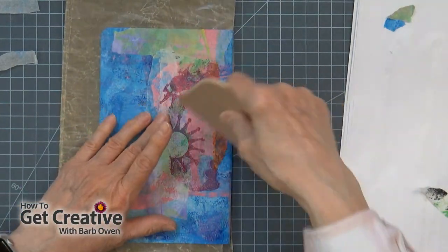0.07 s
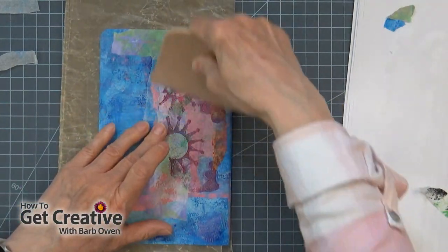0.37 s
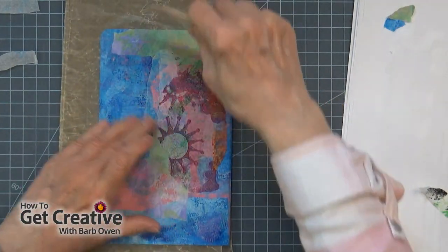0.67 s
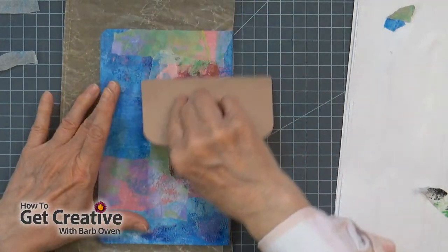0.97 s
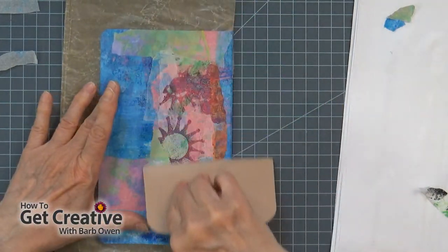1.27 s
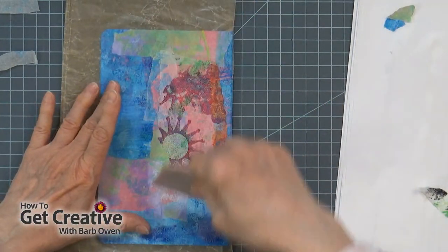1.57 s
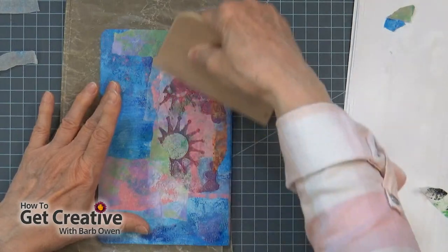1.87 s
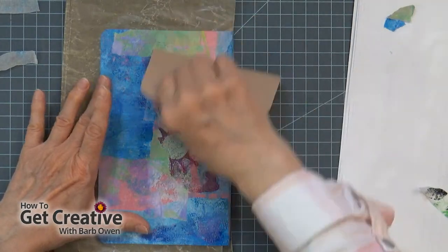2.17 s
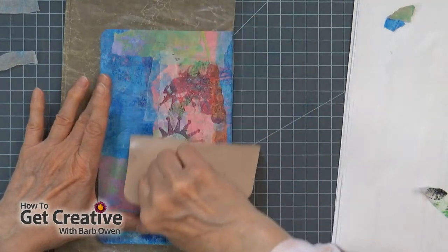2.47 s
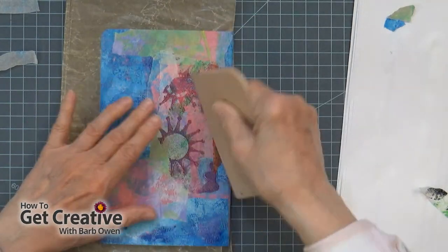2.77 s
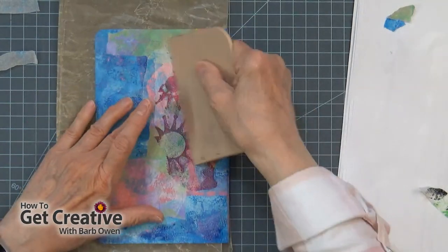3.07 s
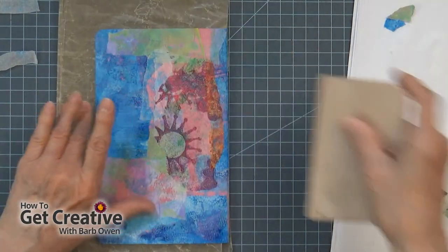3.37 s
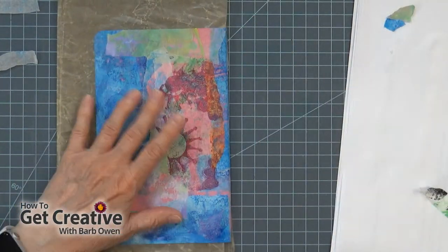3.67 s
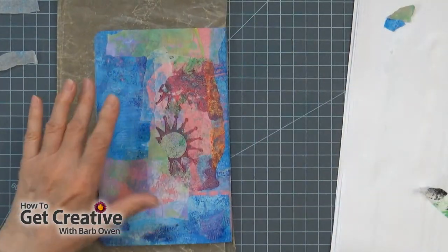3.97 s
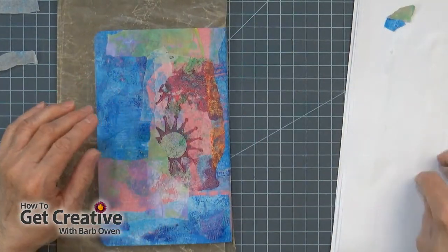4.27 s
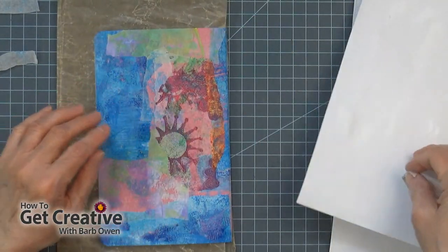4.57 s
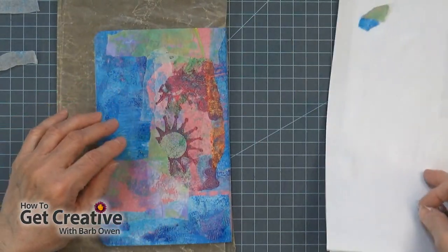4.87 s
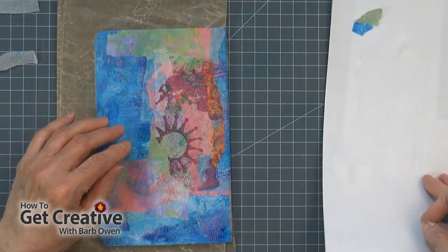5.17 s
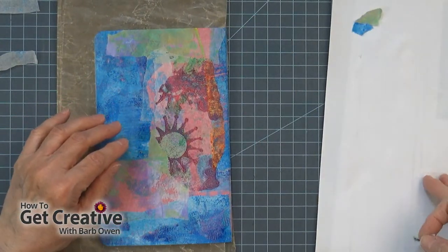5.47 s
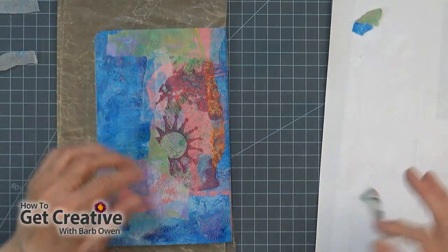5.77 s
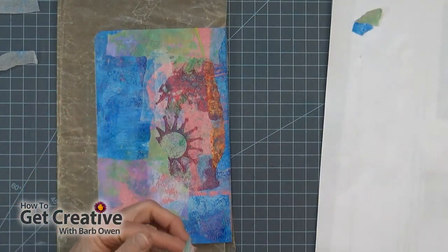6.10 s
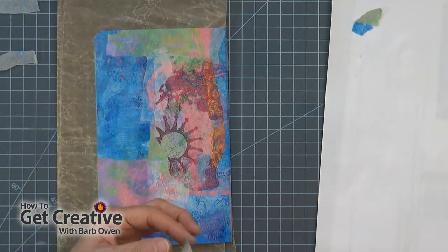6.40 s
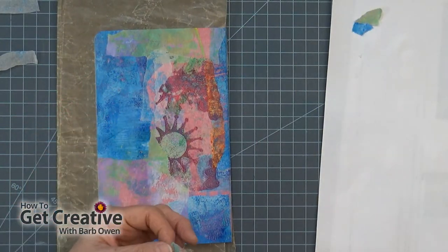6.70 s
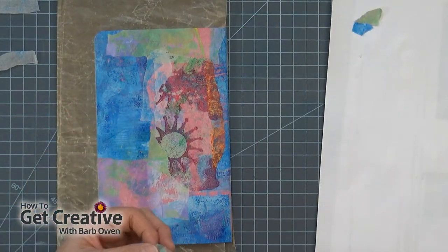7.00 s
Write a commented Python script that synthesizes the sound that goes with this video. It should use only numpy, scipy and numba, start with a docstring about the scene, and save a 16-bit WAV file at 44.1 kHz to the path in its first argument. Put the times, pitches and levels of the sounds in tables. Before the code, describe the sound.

Heard close up in a small room, dry, raspy rubbing stops and restarts five times as a cardboard edge is dragged over glued paper. Light clicks fall between the strokes, and the table rumbles faintly underneath. The scraping gives way to a hand sliding on the page, a few dull bumps, and a sheet of paper rustling and snapping as it is moved. A few faint ticks remain over a soft hiss.

```python
"""Over a soft hiss, a piece of cardboard scrapes in five strokes across freshly glued paper on a table.
Its edge catches and slips on the fibres, and it ticks as it is lifted and set down. Then a hand brushes
the page, and a loose sheet slides off its stack, crackles as it buckles, and settles. The table rumbles
and thumps under the work. One close microphone hears it all in a small room."""
import sys
import numpy as np
from scipy import signal
from scipy.fft import rfft, irfft, next_fast_len
from scipy.io import wavfile
from scipy.ndimage import uniform_filter1d
from numba import njit

SR = 44100
rng = np.random.default_rng(int(sys.argv[2]) if len(sys.argv) > 2 else 0)


def transcribe(signal):
    """Save signal, clipped to [-1, 1], as a 16-bit WAV file at the path in sys.argv[1]."""
    frames = np.atleast_2d(signal).T
    limited = np.clip(frames, -1, 1)
    pcm = np.round(limited * 32767).astype(np.int16)
    wavfile.write(sys.argv[1], SR, pcm)


N = 319284


def from_db(db):
    """Turn decibels into a number to multiply by."""
    return 10 ** (np.asarray(db) / 20)


def rms_one(x):
    """Scale a sound so that its average strength (rms) is 1."""
    return x / np.sqrt(np.mean(x ** 2) + 1e-20)


def in_time(rows):
    """Join (time_s, value) points with straight lines, giving a value at every sample."""
    times_s, values = np.transpose(rows)
    return np.interp(np.arange(N) / SR, times_s, values)


def at_hz(points, hz):
    """Read between (pitch_hz, value) points, with octaves evenly spaced."""
    pitches_hz, values = np.transpose(points)
    return np.interp(np.log(np.maximum(hz, 1)), np.log(pitches_hz), values)


def coloured(x, tone):
    """Shape the lows and highs of a sound with a tone table; the result has strength 1."""
    size = next_fast_len(N)
    hz = np.maximum(np.arange(size // 2 + 1) * SR / size, 1)
    fade_past_ends = np.minimum(1, np.minimum(hz / tone[0][0], tone[-1][0] / hz)) ** 2
    return rms_one(irfft(rfft(x, size) * from_db(at_hz(tone, hz)) * fade_past_ends, size)[:N])


def drift(rate_hz):
    """A smooth random wobble, about 1 in size."""
    step, warm_up = 20, 2000
    r = np.exp(-2 * np.pi * rate_hz * step / SR)
    noise = rng.standard_normal(N // step + warm_up + 2)
    slow = signal.lfilter([1], [1, -2 * r, r * r], noise)[warm_up:]
    return np.interp(np.arange(N) / step, np.arange(len(slow)), rms_one(slow))


def resonate(x, hz, width_hz):
    """Ring at one pitch; a smaller width rings longer."""
    r = np.exp(-np.pi * width_hz / SR)
    return signal.lfilter([1, 0, -1], [1, -2 * r * np.cos(2 * np.pi * hz / SR), r * r], x)


@njit
def glide(x, hz, width_hz):
    """Ring at a pitch that moves."""
    angle, r = 2 * np.pi * hz / SR, np.exp(-np.pi * width_hz / SR)
    y = np.zeros(len(x))
    for i in range(2, len(x)):
        y[i] = x[i] - x[i - 2] + 2 * r * np.cos(angle[i]) * y[i - 1] - r * r * y[i - 2]
    return y


def band(x, low_hz, high_hz):
    """Keep the sound between two pitches."""
    edges_hz = [low_hz, min(high_hz, SR * .45)]
    return signal.sosfilt(signal.butter(2, edges_hz, "band", fs=SR, output="sos"), x)


def swell(peak_s, rise_s, fall_s, roundness=1):
    """Rise to 1 and fall away; more roundness holds the top longer."""
    t = np.arange(N) / SR - peak_s
    distance = t / np.where(t < 0, rise_s, fall_s)
    return np.exp(roundness - np.minimum(np.hypot(roundness, distance), 30))


def rub(peak_s, rise_s, fall_s, db, low_db, high_db):
    """Power of one passing rub in its low, middle and high parts."""
    return (from_db([[db + low_db], [db], [db + high_db]]) * swell(peak_s, rise_s, fall_s)) ** 2


def friction(per_s, spread_db, smooth_share):
    """Fibres catch and let go: tiny slips of uneven size over a smooth rub."""
    sizes = from_db(spread_db * np.minimum(rng.exponential(1, N), 5)) * rng.choice([-1, 1], N)
    slips = rms_one(sizes * (rng.random(N) < per_s / SR))
    return rms_one(slips + smooth_share * rng.standard_normal(N))


# Tone of the room's hiss: pitch_hz, relative_db
HISS_TONE = [(60, -10), (140, -5), (200, -7), (270, -10), (500, -11.5), (850, -14), (1500, -23.5),
             (2400, -16.5), (4000, -15.5), (4900, -23.5), (6500, -24), (7500, -26), (9000, -28.5),
             (15000, -32)]
# Pitches that stand out in it: pitch_hz, rough_width_hz, base_level_db
HISS_PEAKS = [(26.8, 16, -61.5), (134, 33, -66.5), (178.4, 17, -70.5), (530, 112, -75), (1265, 110, -74),
              (2210, 67, -70.5), (2868, 42, -71), (3420, 180, -66)]
# How the whole hiss rises and falls: time_s, change_db
HISS_CHANGES = [(0, 4), (3.2, 3.5), (4.3, 1.5), (5.15, 5), (5.7, -2.5), (6.9, -1), (7.03, 5.5), (7.24, 1.5)]


def room_hiss(base_level_db=-58):
    """Soft background noise with a few faint hums in it."""
    hiss = from_db(base_level_db) * coloured(rng.standard_normal(N), HISS_TONE)
    for hz, width_hz, db in HISS_PEAKS:
        wide_hz = 1.37 * width_hz  # ringing twice narrows the peak again
        hum = resonate(resonate(rng.standard_normal(N), hz, wide_hz), hz, wide_hz)
        hiss += from_db(db) * rms_one(hum)
    return from_db(in_time(HISS_CHANGES)) * hiss


# Tone of the table's rumble: pitch_hz, relative_db
RUMBLE_TONE = [(15, -38), (28, 6.5), (45, -8), (80, -16), (140, -17), (250, -26.5), (500, -23), (1200, -61)]


def table_rumble(rubbing, rest_db=-65, work_db=-53, ordinary_drag_db=-46.5, average_s=0.16):
    """The table rumbles more the harder the hands work."""
    effort = (rubbing / from_db(ordinary_drag_db)) ** 0.36  # follows only part of each swing
    effort = uniform_filter1d(effort, int(average_s * SR))
    strength = np.hypot(from_db(rest_db), from_db(work_db) * effort)
    return strength * coloured(rng.standard_normal(N), RUMBLE_TONE)


SETTLE_S, LIFT_S = 0.032, 0.025  # how long a drag takes to build up and to die away


def lift(end_s):
    """Full contact that fades once the card leaves."""
    return np.exp(-np.clip((np.arange(N) / SR - end_s) / LIFT_S, 0, 20))


def bite(age_s, full_s):
    """The edge digs in, grips hardest after full_s and then eases."""
    progress = age_s / full_s
    return (progress * np.exp(1 - np.minimum(progress, 20))) ** 2


# The card has a low flex (bending), a middle rasp and a high hiss.
# In its tables, level_db sets the rasp; flex_db and hiss_db are added to that for the other two.
# Fingers and sleeve graze the held card: until_s, level_db, flex_db, hiss_db
CARD_GRAZE = (4, -60.5, -13, 3)
# The card brushes the page between strokes: peak_s, rise_s, fall_s, level_db, flex_db, hiss_db
CARD_BRUSHES = [(0.06, 0.028, 0.059, -55, -9, 8), (0.69, 0.029, 0.029, -48, -12, 10),
                (2.705, 0.013, 0.017, -46, -10, 6.5), (2.82, 0.023, 0.015, -47.5, -13, 5.5),
                (2.98, 0.013, 0.018, -44.5, -4, 7.5), (3.285, 0.067, 0.052, -53, -4, 13)]


def card_touches():
    """Power of the flex, rasp and hiss from light touches on the card."""
    until_s, db, flex_db, hiss_db = CARD_GRAZE
    graze = from_db(db) * from_db([[flex_db], [0], [hiss_db]]) * lift(until_s)
    return graze ** 2 + sum(rub(*row) for row in CARD_BRUSHES)


# Strokes of the card over the page:
# start_s, end_s, full_bite_s, bite_db, hiss_above_bite_db, drag_db, start_pitch_hz, end_pitch_hz
CARD_STROKES = [(0.213, 0.537, 0.089, -43, 8.5, -47.5, 855, 780),
                (0.83, 1.441, 0.089, -42.5, 3, -52, 650, 1090),
                (1.668, 1.977, 0.08, -38, 8.5, -50.5, 910, 900),
                (2.059, 2.558, 0.1, -47.5, 11, -46, 1150, 1150),
                (3.023, 3.176, 0.086, -41, 5, -43, 980, 1130)]
# The flick that ends each stroke: level_db, rise_s, fall_s, flex_db, hiss_db
CARD_FLICKS = [(-32, 0.012, 0.0067, -1.5, 14), (-26.5, 0.024, 0.0072, -5.5, 3), (-31, 0.021, 0.011, -8, 7),
               (-35, 0.0088, 0.0059, -5.5, 12), (-25, 0.021, 0.0056, -5.5, 4)]


def card_strokes(bite_flex_db=-3.5, drag_hiss_db=4, flex_lead_s=0.012, roundness=2.23):
    """Power of the flex, rasp and hiss as each stroke bites, drags and speeds up into a flick."""
    t, power = np.arange(N) / SR, 0
    for stroke, ending in zip(CARD_STROKES, CARD_FLICKS):
        start_s, end_s, full_s, bite_db, bite_hiss_db, drag_db, _, _ = stroke
        flick_db, rise_s, fall_s, flex_db, hiss_db = ending
        age_s = np.maximum(t - start_s, 0)
        contact = (1 - np.exp(-age_s / SETTLE_S)) * lift(end_s)
        grip = bite(age_s, full_s)
        bend = bite(age_s, 1.47 * full_s)  # the card bends later than its edge bites
        biting = from_db(bite_db) * from_db([[bite_flex_db], [0], [bite_hiss_db]]) * [bend, grip, grip]
        dragging = from_db(drag_db) * from_db([[0], [0], [drag_hiss_db]])
        flick = swell(end_s, rise_s, fall_s, roundness)
        give = swell(end_s - flex_lead_s, rise_s, fall_s, roundness)  # it gives way just before leaving
        flicking = from_db(flick_db) * from_db([[flex_db], [0], [hiss_db]]) * [give, flick, flick]
        power += contact ** 2 * (biting ** 2 + dragging ** 2) + flicking ** 2
    return power


def card_pitches(flat_middle_hz=2100, flat_edge_hz=3810):
    """The card's lowest ring glides through each stroke; the upper two rise as it tips onto its edge."""
    t, low_points, tip_db = np.arange(N) / SR, [], 0
    for stroke, (_, rise_s, _, _, hiss_db) in zip(CARD_STROKES, CARD_FLICKS):
        start_s, end_s, full_s, _, bite_hiss_db, _, start_hz, end_hz = stroke
        low_points += [(start_s, start_hz), (end_s, end_hz)]
        tip_db += hiss_db * swell(end_s, 2 * rise_s, LIFT_S)  # more hiss stands for more tilt
        tip_db += .5 * bite_hiss_db * bite(np.maximum(t - start_s, 0), full_s)
    return in_time(low_points), flat_middle_hz + 65 * tip_db, flat_edge_hz + 110 * tip_db


def card_part(tone, ring_hz, width_hz, ring_db, slips_per_s):
    """Tiny slips make a broad scrape and also set the card ringing at one pitch."""
    scrape = coloured(friction(slips_per_s, spread_db=0.5, smooth_share=0.96), tone)
    drive = coloured(friction(slips_per_s, spread_db=0.5, smooth_share=0.93), tone)
    ring = rms_one(glide(drive, ring_hz, width_hz))
    return rms_one(scrape + from_db(ring_db) * ring)


# Tones of the card's flex, rasp and hiss: pitch_hz, relative_db
CARD_FLEX_TONE = [(150, -32), (330, -16.5), (500, -12), (620, -9.5), (780, -7.5), (1150, -8.5),
                  (1450, -7.5), (2300, -39)]
CARD_RASP_TONE = [(950, -7), (1500, -6.5), (1900, -0.5), (3000, -1), (3700, -6.5), (5500, -30)]
CARD_HISS_TONE = [(2000, -26), (3200, -0.5), (4200, 0.5), (6200, 0), (7500, -1.5), (10000, -4.5),
                  (13000, -12.5), (16000, -18)]


def cardboard(flex, rasp, hiss):
    """The edge judders over the page: coarse catches bend the card, the finest ones hiss."""
    low_hz, middle_hz, edge_hz = card_pitches()
    low = flex * card_part(CARD_FLEX_TONE, low_hz, width_hz=170, ring_db=-0.5, slips_per_s=1100)
    middle = rasp * card_part(CARD_RASP_TONE, middle_hz, width_hz=380, ring_db=-8.5, slips_per_s=3000)
    high = hiss * card_part(CARD_HISS_TONE, edge_hz, width_hz=2300, ring_db=-1.0, slips_per_s=5000)
    judder_db = 1.3 * drift(rate_hz=84)
    return from_db(judder_db) * (from_db(-0.97) * low + from_db(-1.15) * middle + from_db(-1.5) * high)


# Taps of the card and snaps of the paper: start_s, base_level_db, pitch_hz, crack_db, knock_db
# (the last two are added to the base level)
TAPS_AND_SNAPS = [(0.222, -27.5, 3420, -21, -3.5), (0.4818, -21.5, 5100, -16, -13),
                  (0.5936, -33, 5330, -10, -24), (0.681, -26, 6140, -11, -18),
                  (0.7143, -28.5, 6300, -7, -9.5), (0.818, -21.5, 3850, -20, -13),
                  (0.851, -26, 5500, -2.5, -13), (0.8902, -29.5, 4740, -19, -11.5),
                  (1.3585, -34.5, 3400, -11, 4), (1.6789, -36, 2450, -19, 6),
                  (2.2462, -31, 5300, -13, -1.5), (2.616, -35, 4270, -15, -14),
                  (2.6957, -26.5, 4700, -13, -36), (2.6997, -28, 4030, -22, -30),
                  (2.883, -37, 5500, -14, -11), (2.888, -28.5, 3960, -20, -19.5),
                  (2.9604, -30.5, 4060, -13, -1), (3.099, -28.5, 6030, -10, -24),
                  (3.3194, -33.5, 3730, -9, -27), (3.3283, -31.5, 3960, -14, -16),
                  (3.414, -38.5, 3800, -6, -10), (3.4184, -30.5, 5650, -7, -18),
                  (3.4898, -40, 7160, -11, -22), (3.5619, -38.5, 6280, 4, -32), (3.67, -29, 4000, -6, -27),
                  (3.7814, -29.5, 3480, -6, -6.5), (3.819, -23, 6100, -9, -18),
                  (3.8552, -30, 5400, -5, -12), (3.8925, -35, 4100, -9, -4.5), (3.93, -21, 4000, -13, -6),
                  (3.936, -16.5, 2780, -9.5, -10), (3.9859, -30.5, 3720, -11, -0.5),
                  (3.9919, -28.5, 3400, -1, -3), (4.338, -24.5, 5750, -4, -15.5),
                  (4.8325, -24.5, 3420, -13.5, -17), (5.303, -40.5, 4200, -3.5, -20),
                  (5.487, -42, 5600, -6, -24), (5.985, -57, 6500, -2, -20), (6.8992, -46, 4580, -11, -24),
                  (6.9569, -32.5, 5200, -3, -10.5), (7.0988, -51, 5000, -1, -9)]


def ticks(crumble_s=0.0014, crack_s=0.00086, ring_trim_db=0.76, crack_trim_db=0.8, knock_trim_db=-3.5):
    """Each tick is a ringing snap of crumbling fibres, a sharp crack and a knock on the table."""
    size, opening = 2048, 176  # samples; the first 4 ms set the level
    out, t = np.zeros(N + size), np.arange(size) / SR
    for start_s, db, hz, crack_db, knock_db in TAPS_AND_SNAPS:
        fibres = rng.standard_normal(size) * (1 - np.exp(-t / 0.00028))
        snap = fibres * np.exp(-t / crumble_s)
        snap[4] += 3.2  # the click at the start
        ring = band(resonate(snap, hz, width_hz=2950), 0.49 * hz, 1.4 * hz)
        crack = band(fibres * np.exp(-t / crack_s), 7800, 13200)
        knock = band(snap, 266, 1700)
        start = int(start_s * SR)
        offsets_db = ring_trim_db, crack_db + crack_trim_db, knock_db + knock_trim_db
        for part, offset_db in zip((ring, crack, knock), offsets_db):
            strength = np.sqrt(np.mean(part[:opening] ** 2))
            out[start:start + size] += from_db(db + offset_db) * part / strength
    return out[:N]


# The fingers change their hold: start_s, end_s
GRIP_CHANGES = [(0.57, 0.61), (0.68, 0.73), (0.86, 0.9), (2.6, 2.73), (2.8, 3.02), (3.3, 3.44), (3.66, 3.9),
                (4.66, 4.7), (5.29, 5.33)]


def crinkles(rubbing, per_s=85, spread_db=5.5, crumble_s=0.001):
    """Shifting fingers and grit under a rubbing edge set off faint stray ticks."""
    t, out = np.arange(N) / SR, 0
    fingers = from_db(-36.5) * sum((t > start_s) & (t < end_s) for start_s, end_s in GRIP_CHANGES)
    grit = np.minimum(from_db(7.5) * rubbing, from_db(-30))  # grit lets go at this size
    strength = np.hypot(fingers, grit)
    age_s = t[t < .02]
    for hz in (3700, 5200, 7600):
        catches = strength * (rng.random(N) < per_s / 3 / SR)
        sizes = from_db(spread_db * (2 * rng.random(N) - 1)) * rng.choice([-1, 1], N)
        fibres = rng.standard_normal(len(age_s)) * np.exp(-age_s / crumble_s)
        crumbles = signal.oaconvolve(catches * sizes, fibres / np.linalg.norm(fibres))[:N]
        out += resonate(crumbles + 1e-18, hz, width_hz=1600)
    return band(out, 1400, 16000)


# The hand and the sheet land on the table: start_s, level_db
LANDINGS = [(0.819, -51.5), (3.819, -54), (3.93, -38), (3.986, -45), (4.427, -45)]
# Pitches at which the table top rings: pitch_hz, width_hz, relative_db
TABLE_RINGS = [(74, 14, -3), (118, 20, 0), (175, 10.8, -3), (273, 120, 2), (466, 23, -23)]


def table_thumps():
    """Soft blows set the table top ringing briefly."""
    blow, blows = signal.unit_impulse(8192), np.zeros(N)
    ring = sum(from_db(db) * resonate(blow, hz, width_hz) * (-1) ** k
               for k, (hz, width_hz, db) in enumerate(TABLE_RINGS))
    ring = band(ring, 31, 640)
    ring /= np.sqrt(np.mean(ring[:880] ** 2))  # the first 20 ms set the level
    for start_s, db in LANDINGS:
        blows[int(start_s * SR)] = from_db(db)
    return signal.fftconvolve(blows, ring)[:N]


# Paper slides under the hand and off its stack: peak_s, rise_s, fall_s, level_db, flap_db, sheen_db
# (level_db sets the rustle; the last two are added to it)
PAPER_SLIDES = [(3.659, 0.0023, 0.041, -31.5, -13, -7.5), (3.748, 0.026, 0.017, -33.5, -21, -4.5),
                (3.815, 0.015, 0.018, -34.5, -9.5, -20), (3.949, 0.01, 0.035, -36.5, -7, -4.5),
                (4.262, 0.0047, 0.043, -49, -10, 7.5), (4.365, 0.021, 0.022, -36.5, -10.5, 6.5),
                (4.436, 0.023, 0.014, -28, -6.5, -10), (4.721, 0.029, 0.01, -39, -7.5, -5.5),
                (4.835, 0.028, 0.048, -34.5, -16.5, -9), (5.164, 0.022, 0.039, -40, -3.5, -12),
                (5.31, 0.022, 0.012, -43.5, -28, -10), (5.8, 0.033, 0.092, -58, -13, -5.5),
                (6.98, 0.01, 0.2, -61, -2, -4)]
# The loose sheet whispers while it is moved: same columns (the sign of rise_s has no effect)
SHEET_WHISPER = (4.5, -0.4, 0.5, -49.5, -7.5, -12)


def paper_slides():
    """Power of the moving paper's low flap, middle rustle and high sheen (a fine hiss)."""
    return sum(rub(*row) for row in PAPER_SLIDES) + rub(*SHEET_WHISPER)


# Tones of the paper's flap, rustle and sheen: pitch_hz, relative_db
FLAP_TONE = [(150, 0), (550, -10), (850, -4), (1400, -4.5), (1900, -2.5), (2500, -0.5), (3100, -5.5),
             (4500, -10)]
RUSTLE_TONE = [(1500, -15.5), (2500, -2), (3200, 4.5), (4300, 5), (5600, 3.5), (7000, -2.5), (9500, -8.5)]
SHEEN_TONE = [(4500, -9), (7200, -3.5), (9000, -5.5), (11500, -11), (14000, -11), (16000, -21)]


def paper(flap, rustle, sheen):
    """Paper slides on paper and under the hand, its fine grain catching unevenly."""
    low = flap * coloured(friction(per_s=1100, spread_db=5.5, smooth_share=0.52), FLAP_TONE)
    middle = rustle * coloured(friction(per_s=4500, spread_db=5.5, smooth_share=1.0), RUSTLE_TONE)
    high = sheen * coloured(friction(per_s=10000, spread_db=2.2, smooth_share=1.2), SHEEN_TONE)
    catch_db = 1.1 * drift(rate_hz=70)
    return from_db(catch_db) * (from_db(-0.5) * low + from_db(-3.5) * middle + from_db(-0.5) * high)


# The loose sheet buckles and flaps: start_s, peak_level_db, rise_s, fall_s, lowest_pitch_hz
BUCKLES = [(4.418, -25, 0.0059, 0.014, 796), (4.477, -32.5, 0.003, 0.011, 720),
           (4.9934, -18, 0.0011, 0.0024, 1290), (5.1389, -22, 0.0023, 0.0054, 600)]
# Pitches at which the bending sheet rings: pitch_hz, width_hz, relative_db
SHEET_RINGS = [(874, 140, -1.5), (1390, 440, 0.5), (1830, 1280, -0.5), (2770, 600, 5), (3360, 690, 0.5),
               (4740, 3100, -10.5)]


def sheet_buckles():
    """Each buckle is a short rush of slipping fibres that rings the sheet."""
    t, out = np.arange(N) / SR, 0
    slips = friction(per_s=8200, spread_db=4.5, smooth_share=0.61)
    ring = sum(from_db(db) * width_hz * resonate(slips, hz, width_hz) * (-1) ** k
               for k, (hz, width_hz, db) in enumerate(SHEET_RINGS))
    for start_s, db, rise_s, fall_s, lowest_hz in BUCKLES:
        age_s = np.maximum(t - start_s, 0)
        rise = 1 - np.exp(-np.minimum(age_s / rise_s, 10) ** 2)
        push = rise * np.exp(-np.minimum(age_s / fall_s, 20))
        out += from_db(db) * push / push.max() * rms_one(band(ring, lowest_hz, 7300))
    return out


# How long the room's echo takes to fade by 60 dB: pitch_hz, fade_s
ECHO_FADES = [(200, 0.63), (1500, 0.14), (5000, 0.26), (14000, 0.2)]


def room(x, tail_db=-14.5, near_db=-16.0, near_s=0.0075, size=22050):
    """Sound bounces off things on the table, then leaves a short echo that lasts longest in the bass."""
    t, tail = np.arange(size) / SR, 0
    edges_hz = np.geomspace(80, 18000, 9)
    for low_hz, high_hz in zip(edges_hz, edges_hz[1:]):
        fade_s = at_hz(ECHO_FADES, np.sqrt(low_hz * high_hz))
        tail += band(rng.standard_normal(size), low_hz, high_hz) * from_db(-60 * t / fade_s)
    tail *= t > .006
    near = band(rng.standard_normal(size) * (t > .003) * np.exp(-t / near_s), 320, 16000)
    echo = from_db(tail_db) * tail / np.linalg.norm(tail) + from_db(near_db) * near / np.linalg.norm(near)
    return x + signal.fftconvolve(x, echo)[:N]


def scene():
    """Everything reaches one microphone, the same in both ears."""
    flex, rasp, hiss = np.sqrt(card_touches() + card_strokes())
    flap, rustle, sheen = np.sqrt(paper_slides())
    handling = ticks() + crinkles(np.hypot(hiss, .5 * rustle)) + sheet_buckles() + table_thumps()
    rubbing = cardboard(flex, rasp, hiss) + paper(flap, rustle, sheen)
    mono = room(rubbing + handling) + room_hiss() + table_rumble(rasp + flap)
    return np.array([mono, mono])


def record(dry):
    """Cut the treble steeply above 16000 Hz."""
    return signal.sosfilt(signal.ellip(10, .1, 80, 16000, fs=SR, output="sos"), dry)


dry = scene()
out = record(dry)
transcribe(out)
```